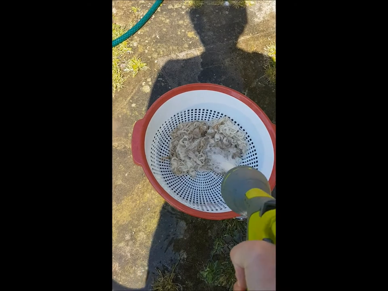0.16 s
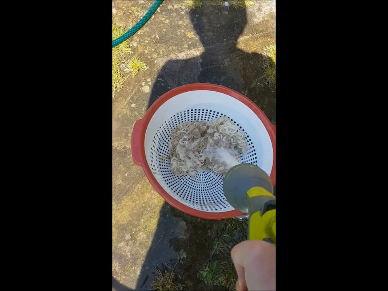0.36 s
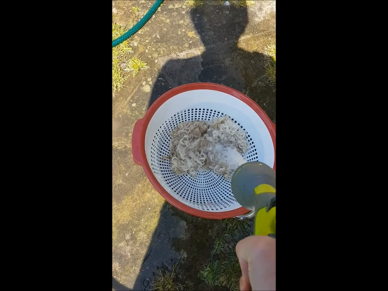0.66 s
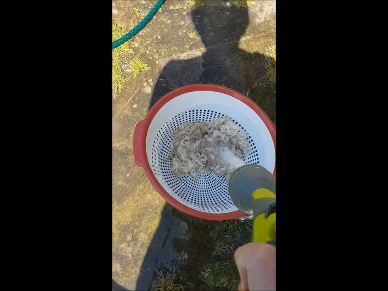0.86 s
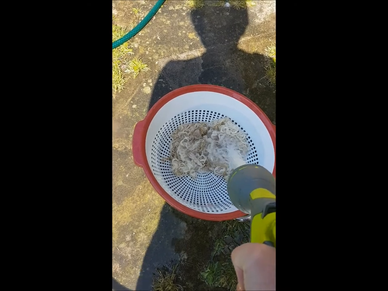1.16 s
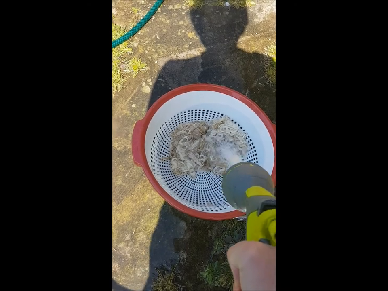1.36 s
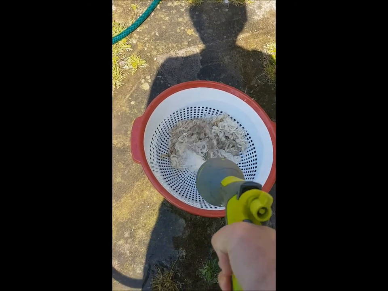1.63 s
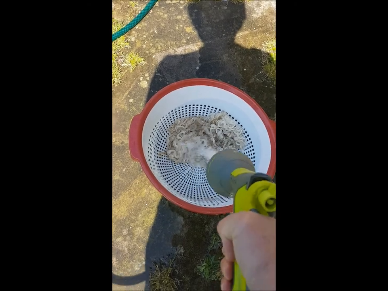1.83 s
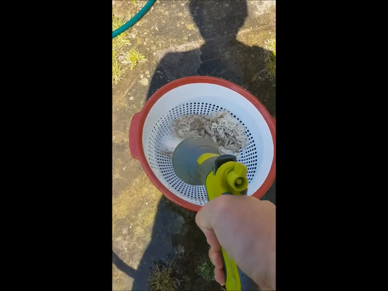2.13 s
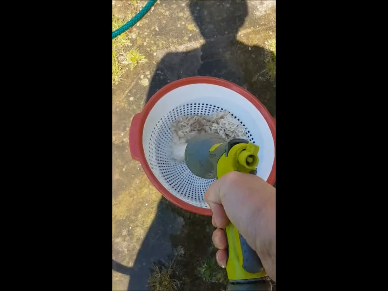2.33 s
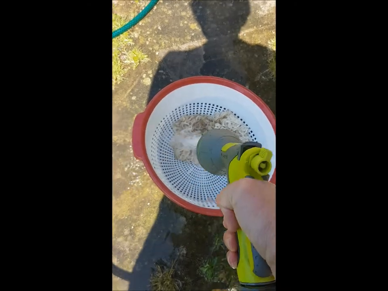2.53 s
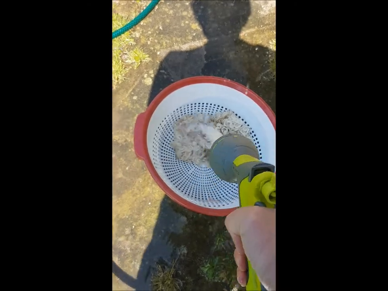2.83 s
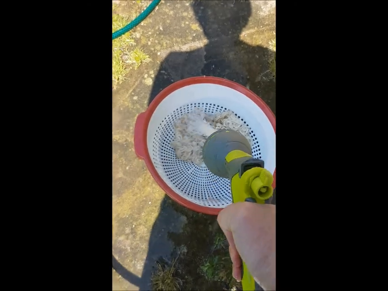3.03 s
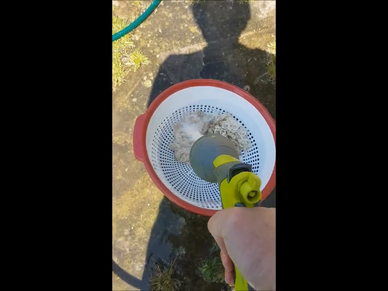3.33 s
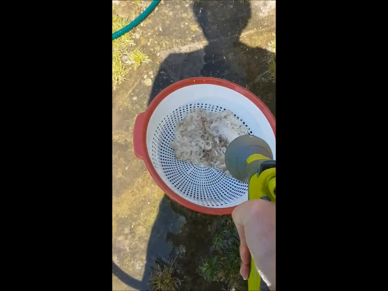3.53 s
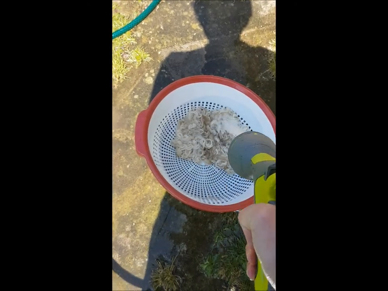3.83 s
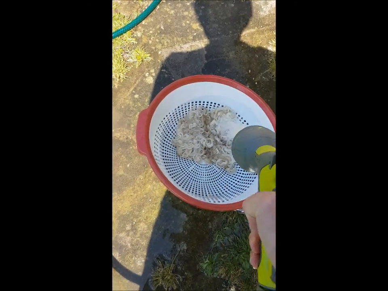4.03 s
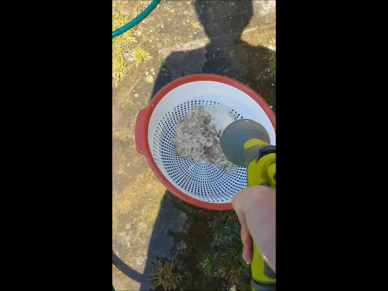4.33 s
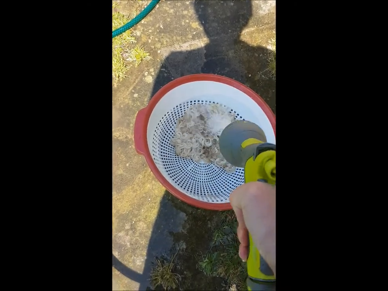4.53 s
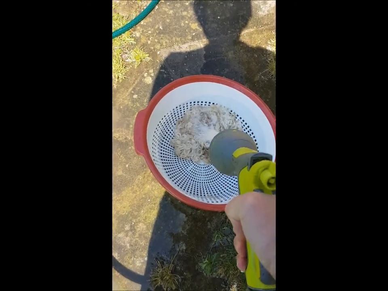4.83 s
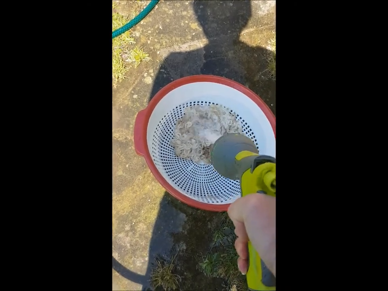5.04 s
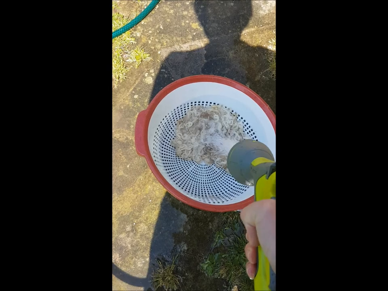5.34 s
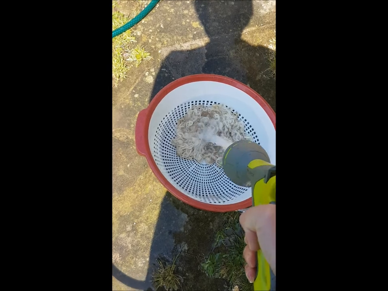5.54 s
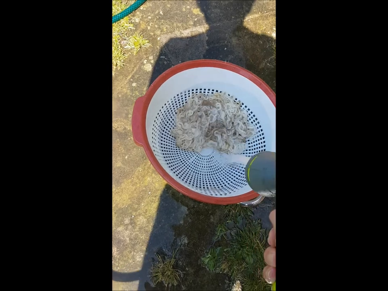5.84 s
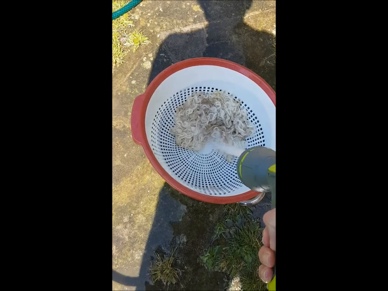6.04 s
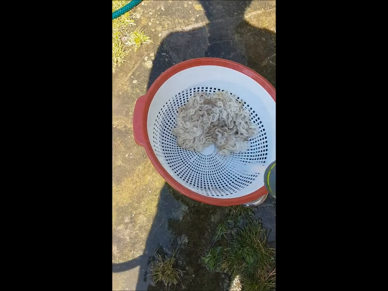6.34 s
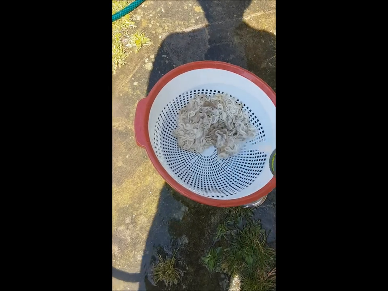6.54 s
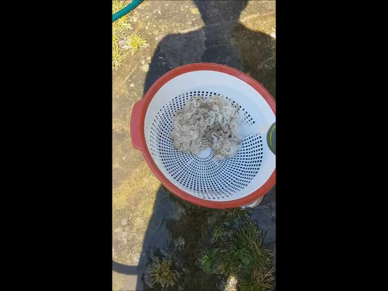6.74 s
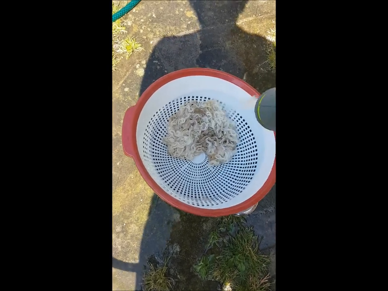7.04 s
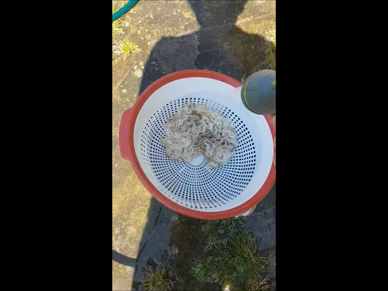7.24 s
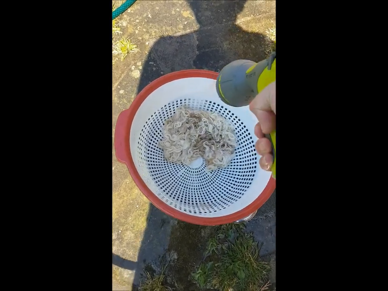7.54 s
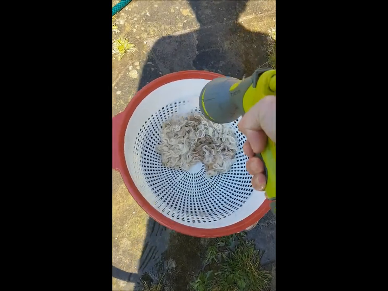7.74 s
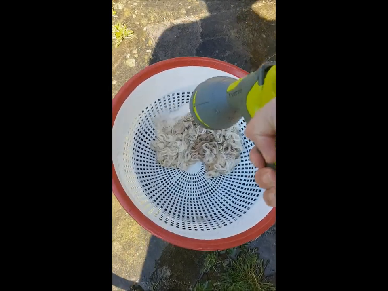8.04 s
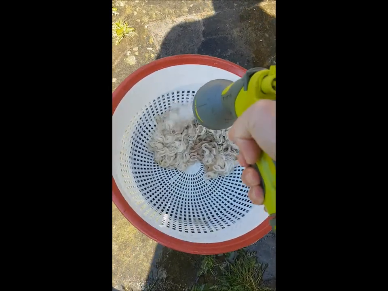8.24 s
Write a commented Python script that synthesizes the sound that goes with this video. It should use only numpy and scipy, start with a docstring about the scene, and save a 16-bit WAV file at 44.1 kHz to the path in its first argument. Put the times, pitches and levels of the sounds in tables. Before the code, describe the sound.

Outdoors, a hose nozzle sprays steadily into a plastic colander, a bright gritty hiss with hollow drumming as the jet sweeps bare wall and wet heap.

```python
"""Paved ground outdoors: a garden hose sprays into a plastic colander, heard from above at two microphone ports.
Dense drops, as noise with random jumps, ring the bowl's wall modes, splash on the food and hiss as mist.
Where the jet lands sets the mix, by level curves; narrow bands of the water swell and fade at random.
Light wind rumbles at each port on its own and thumps the right one; a faint low hum swells twice."""
import sys
import numpy as np
from scipy import signal
from scipy.fft import rfft, irfft, next_fast_len
from scipy.io import wavfile
from scipy.ndimage import uniform_filter1d

SR = 44100
rng = np.random.default_rng(int(sys.argv[2]) if len(sys.argv) > 2 else 0)


def waveform_to_disk(signal):
    """Save audio, clipped to [-1, 1], as 16-bit WAV at the path in sys.argv[1]."""
    frames = np.transpose(np.atleast_2d(signal))
    scaled = np.clip(frames, -1, 1) * 32767
    samples = np.round(scaled).astype(np.int16)
    wavfile.write(sys.argv[1], SR, samples)


N = 369999
TIME_S = np.arange(N) / SR
SIZE = next_fast_len(N, real=True)
BIN_HZ = np.fft.rfftfreq(SIZE, 1 / SR)


def undb(db):
    """Amplitude ratio of a level in dB."""
    return np.exp(np.asarray(db) * np.log(10) / 20)


def unit(x):
    """Scales x to an RMS of 1."""
    return x / np.sqrt(np.mean(x ** 2))


def swing(x):
    """Deviation of a curve from its mean."""
    return x - np.mean(x)


def curves(table):
    """Table columns joined by straight lines, one value a sample."""
    s, *columns = np.transpose(table)
    return [np.interp(TIME_S, s, column) for column in columns]


def walk(rate_hz):
    """Random levels held 1 / rate_hz and slewed twice; spread near 1."""
    hold = int(SR / rate_hz)
    steps = np.repeat(rng.standard_normal(N // hold + 1), hold)
    slewed = uniform_filter1d(uniform_filter1d(steps, hold), hold)
    return 1.3 * slewed[:N]


def band(spectrum, hz, width_hz):
    """Steep resonance without phase turn, so that neighbouring bands add up smoothly; RMS 1."""
    f = BIN_HZ + 1  # keeps clear of division by zero
    detuning = (f - hz ** 2 / f) / width_hz
    return unit(irfft(spectrum / (1 + detuning ** 2), SIZE)[..., :N])


def slide(x, shift_hz):
    """Moves every frequency of x by a changing amount."""
    turn = np.exp(2j * np.pi * np.cumsum(shift_hz) / SR)
    return np.real(signal.hilbert(x, SIZE)[:, :N] * turn)


def drops(big_db, big_share=.02, tail_s=0.00074, most_db=12):
    """Spectra of two streams of dense impacts: noise that jumps where a larger drop lands, in both alike."""
    landed = rng.random(N) < big_share
    hits = landed * undb(np.minimum(big_db * rng.exponential(size=N), most_db))
    keep = np.exp(-1 / (tail_s * SR))
    strength = 1 + 0.33 * signal.lfilter([1], [1, -keep], hits)
    return rfft(strength * rng.standard_normal((2, N)), SIZE)


def surges():
    """Brief lifts in dB, each a smooth bump, as the jet sweeps across bare wall."""
    # bumps: centre_s, length_s, lift_db
    bumps = [(2.02, 0.078, 5.5), (2.172, 0.059, 5.5), (2.51, 0.073, 6.5), (3.738, 0.06, 6), (4.19, .08, 4),
             (4.36, .1, 2), (5.285, .05, 4), (5.838, 0.086, 3), (6.47, 0.14, 3.5), (8.173, 0.083, 4.5)]
    return sum(db * np.exp(-(2 * (TIME_S - s) / length_s) ** 2) for s, length_s, db in bumps)


def bowl():
    """Drops ring each wall mode; a broad skirt stands for the weaker modes around it; the jet sputters."""
    # wall modes, low to high: pitch_hz, width_hz, skirt_width_hz, skirt_db, trim_db
    modes = [(383, 44, 272, 5, 0.7), (771, 218, 210, -11, -1.54), (1203, 430, 380, -9, -2.8),
             (1764, 310, 420, -8, -7), (2208, 420, 1000, 1.5, 2.57), (2827, 960, 890, 20, 7.5)]
    # pooled water's resonance: pitch_hz, width_hz, trim_db
    pool = (617, 165, -8)
    # lowest mode: time_s, level_db
    lowest = [(0.0, -52.5), (1.44, -54.5), (1.65, -57), (1.89, -55), (2.37, -59), (3.36, -50.5),
              (3.72, -55.5), (4.44, -50), (6.15, -55.5), (6.27, -62), (7.38, -55), (7.71, -65.5),
              (8.28, -64), (8.39, -70)]
    # main (second) mode, high on bare wall, low where the jet sinks into the heap: time_s, level_db
    main = [(0.0, -55.0), (0.28, -54), (1.94, -55), (1.98, -45.5), (2.18, -41.5), (2.24, -46.5),
            (2.5, -43.5), (2.66, -57.5), (3.26, -42.0), (3.56, -45.5), (3.6, -56), (3.7, -48), (4.1, -44.5),
            (4.14, -41), (4.4, -41.0), (4.5, -51), (4.54, -40), (4.6, -50.5), (4.82, -48.5), (4.88, -53.0),
            (4.96, -48.5), (5.12, -55), (6.22, -46.5), (6.26, -54.5), (6.5, -43), (6.84, -47.0),
            (6.94, -38.5), (7.28, -48), (8.08, -41), (8.18, -35), (8.32, -46.5), (8.39, -46)]
    # third mode: time_s, level_db
    third = [(0.0, -52), (1.04, -56.0), (1.58, -49), (1.72, -60.0), (2.18, -49), (2.26, -50.5),
             (3.8, -52.5), (4.3, -46.0), (4.56, -51.5), (6.36, -51.5), (6.46, -49.5), (6.84, -53.0),
             (6.96, -44), (7.6, -43.5), (7.68, -42.5), (8.39, -49.5)]
    # fifth mode, whose pitch wanders with the aim: time_s, level_db, pitch_hz
    wander = [(0.0, -50.5, 2110.0), (1.47, -48, 2230.0), (1.56, -51, 2220.0), (1.71, -55, 2210.0),
              (2.22, -47.5, 2160.0), (2.85, -54, 2150.0), (4.23, -48, 2100.0), (4.53, -51.5, 2030.0),
              (4.74, -49, 2030.0), (5.73, -51.5, 2120.0), (5.82, -50.0, 2130.0), (6.03, -53.5, 2130.0),
              (6.39, -49.5, 2120.0), (6.9, -50.5, 2090.0), (7.08, -43.5, 2270.0), (7.65, -46, 2210.0),
              (7.71, -49, 2210.0), (8.39, -52.0, 2070.0)]
    # highest mode: time_s, level_db
    highest = [(0.0, -49.5), (0.66, -53.5), (0.84, -50), (1.44, -53.0), (1.53, -59.5), (1.92, -50),
               (2.43, -55.5), (2.76, -53.5), (4.77, -57), (5.1, -59.5), (5.97, -54.5), (6.57, -56.5),
               (7.98, -54), (8.39, -59)]
    wander_row = 4
    opposed = 0.61  # share of the highest mode's drive that swings against its neighbour

    knock, sputter = drops(big_db=2.0, big_share=.004, tail_s=0.0018, most_db=11.5), walk(35)
    # other drops drive the wandering mode, so it does not beat against its fixed neighbours
    others = drops(big_db=-2.0, big_share=0.0043, tail_s=0.0024, most_db=13)

    (lowest_db,), (main_db,), (third_db,) = curves(lowest), curves(main), curves(third)
    (wander_db, wander_hz), (highest_db,) = curves(wander), curves(highest)
    fourth_db = -51.5 + 0.28 * swing(main_db) + 0.13 * swing(third_db)
    lift_db = surges()
    levels_db = [lowest_db, main_db, third_db + 0.97 * lift_db, fourth_db + lift_db,
                 wander_db + 0.6 * lift_db, highest_db]

    # water pools as the rinsing goes on
    pool_hz, pool_width_hz, pool_trim_db = pool
    pool_rise_db_per_s = 2
    pool_db = -56.5 + 0.61 * swing(main_db) + pool_rise_db_per_s * swing(TIME_S)
    out = band(knock, pool_hz, pool_width_hz) * undb(pool_db + pool_trim_db + 0.81 * walk(22))

    shared_surge = walk(14)
    for k, ((hz, width_hz, skirt_hz, skirt_db, trim_db), level_db) in enumerate(zip(modes, levels_db)):
        drive = knock
        if k > wander_row:  # leaves a dip between the two highest modes
            drive = np.sqrt(1 - opposed ** 2) * others - opposed * knock
        if k == wander_row:
            ring = slide(band(others, hz, width_hz), wander_hz - hz)
        else:
            ring = band(drive, hz, width_hz)
        ring = ring + undb(skirt_db) * band(drive, hz, skirt_hz)
        shared_db = 0.8 * sputter + 0.52 * shared_surge
        own_db = 0.56 * walk(40) + 0.83 * walk(16)
        out = out + unit(ring) * undb(level_db + trim_db + shared_db + own_db)
    return out


def hiss(bands, level_db, bright_db, grain, sputter_db, flicker_db):
    """Fine drops through broad bands that sputter together and flicker alone; brightness tips top against bottom."""
    out = 0
    for tip, (hz, width_hz, band_db) in zip(np.linspace(-.5, .5, len(bands)), bands):
        own_db = flicker_db * (walk(25) + 0.66 * walk(7))
        out = out + undb(band_db + tip * bright_db + own_db) * band(grain, hz, width_hz)
    return unit(out) * undb(level_db + sputter_db)


def spray():
    """Splash on the food and mist from the nozzle; each has its own drops, the jet's sputter moves both."""
    # splash: time_s, level_db
    splash_curve = [(0.0, -48), (0.33, -51.5), (0.42, -46.5), (0.78, -51), (1.47, -49), (1.62, -52.5),
                    (2.1, -51), (2.22, -55.5), (3.6, -47), (3.69, -50.5), (4.26, -51), (4.74, -46),
                    (5.67, -48.5), (5.73, -52.5), (6.09, -49.5), (6.27, -52), (7.53, -53.0), (8.07, -49.5),
                    (8.28, -42.5), (8.39, -49)]
    # lower mist bands: time_s, level_db
    mist_curve = [(0.0, -56.5), (0.22, -54.5), (1.42, -54), (2.3, -58), (2.4, -60), (2.52, -55),
                  (2.68, -53), (4.36, -55), (4.44, -49), (5.66, -52.5), (5.82, -55.5), (6.14, -51.5),
                  (6.36, -61), (6.64, -56.5), (7.54, -56.5), (8.16, -50.5), (8.28, -42), (8.39, -48)]
    # splash bands: pitch_hz, width_hz, level_db
    splash_bands = [(3670, 1940, 8), (4420, 940, -3.5), (5830, 1300, 3.5), (6760, 2400, -1.5)]
    # mist bands: pitch_hz, width_hz, level_db
    mist_bands = [(7970, 2550, 0.5), (10340, 2700, -5), (12700, 3800, 0), (14700, 4700, 1.5)]
    (splash_db,), (haze_db,) = curves(splash_curve), curves(mist_curve)
    surge, sputter = walk(14), walk(30) + 1.4 * walk(80)

    splash_swing = swing(splash_db)
    steadied = 1 - 0.36  # the lower splash bands swing less than the upper ones
    splash_bright_db = steadied * splash_swing + 0.6 * walk(6)
    splash_db = splash_db - steadied / 2 * splash_swing + 0.4 * surge + 0.55 * walk(9)
    splash = hiss(splash_bands, splash_db + 3.5, splash_bright_db, drops(big_db=3.0),
                  0.39 * sputter, flicker_db=1.37)

    mist_swing = swing(haze_db) + 0.91 * surge + 1.45 * walk(16)
    # the topmost hiss comes from the nozzle itself: it swells less than the rest and grows slowly
    bright_rise_db_per_s = 0.7
    mist_bright_db = bright_rise_db_per_s * swing(TIME_S) - 0.84 * mist_swing
    mist_db = np.mean(haze_db) + 5.5 + 0.46 * mist_swing
    fine_drops = drops(big_db=7.0, big_share=.008, tail_s=0.00039, most_db=18)
    mist = hiss(mist_bands, mist_db, mist_bright_db, fine_drops, 0.36 * sputter, flicker_db=0.8)
    return splash + mist


def small_modes(pair, depth_db=2.0, wide_bins=2, long_frames=7):
    """Many small modes ring and fade as the jet moves: narrow bands swell at random for hundredths of a second."""
    z = signal.stft(pair, nperseg=1024, noverlap=768)[2]
    field = rng.standard_normal(z.shape[1:])
    for _ in range(2):
        field = uniform_filter1d(field, wide_bins, axis=0)
        field = uniform_filter1d(field, long_frames, axis=1)
    gain = unit(undb(depth_db * unit(field)))
    return signal.istft(z * gain, nperseg=1024, noverlap=768)[1][:, :N]


def ports(pair):
    """The left port hears the first stream; the right hears it turned in phase, mixed with the second."""
    # balance of the ports: pitch_hz, left_minus_right_db, likeness (0-1)
    balance = [(250, -2.5, 1), (400, -7.5, 0.88), (470, 3.5, 0.2), (652, 7, 1), (960, -6, 0.56),
               (1200, 0, 0.93), (1800, -2.5, 0.53), (2100, -4.5, 0.65), (3120, -4.5, 0.36),
               (4000, -2.5, 0.4), (5250, -4.5, 0.85), (5640, -2, 0), (6800, -6, 0.99), (8060, 9.5, 0.12),
               (8800, 12.5, 0.26), (10000, 10, 0), (11600, 14, .17), (13000, 2, .38), (14600, 4, 0.9),
               (15600, -3, 1)]
    # phase lead of the right port: pitch_hz, lead_rad
    lead = [(300, .2), (500, -.7), (850, .6), (1050, -.7), (1700, .3), (2100, -.7), (3200, -1.9),
            (3900, -1.2), (4250, -2.3), (4600, 0)]
    hz, *columns = np.transpose(balance)
    pan_db, alike = (np.interp(BIN_HZ, hz, column) for column in columns)
    alike = np.clip(alike, 0, 1)
    turn = np.exp(1j * np.interp(BIN_HZ, *np.transpose(lead)))
    first, second = rfft(pair, SIZE)
    right = alike * turn * first + np.sqrt(1 - alike ** 2) * second
    left_share = 1 / (1 + undb(-pan_db))  # the louder port keeps most of the level
    return irfft(2 * np.array([left_share * first, (1 - left_share) * right]), SIZE)[:, :N]


def wind():
    """Low turbulence, unrelated and gusty at each port, with single thumps on the right."""
    # rumble at the left port, before the gain below: time_s, level_db
    left = [(0.0, -72.5), (0.24, -73), (0.9, -84), (1.56, -75.5), (3.0, -83.5), (3.33, -78), (4.23, -82.0),
            (4.62, -73), (5.01, -88), (6.72, -82.5), (6.84, -79), (8.39, -81)]
    # rumble at the right port, before the gain below: time_s, level_db
    right = [(0.0, -69), (0.69, -71), (0.84, -87), (2.22, -70), (2.34, -82.5), (3.33, -78.5), (3.42, -68),
             (4.17, -68), (4.35, -80), (5.13, -95), (5.31, -68), (5.61, -82), (5.85, -68), (6.15, -79),
             (6.24, -66.5), (7.14, -68.5), (7.32, -56), (7.59, -75), (7.77, -60.5), (8.39, -80)]
    # gust thumps on the right port, before the gain below: time_s, level_db
    thumps = [(2.911, -55), (3.545, -48), (3.83, -46), (3.989, -50), (4.139, -55), (5.847, -53),
              (6.275, -47), (6.388, -52), (6.711, -46), (7.219, -49), (7.278, -56), (7.324, -48),
              (7.359, -44), (7.388, -36), (7.429, -50), (7.766, -38), (7.786, -46), (8.004, -41.5)]
    out = np.empty((2, N))
    for k, table in enumerate((left, right)):
        noise = rfft(rng.standard_normal(N), SIZE)
        rumble = band(noise, 76.0, 84.0) + 0.17 * band(noise, 100.0, 200.0)
        gusty = unit(rumble * undb(2.7 * walk(30) + 0.82 * walk(8.3)))
        out[k] = 2 * gusty * undb(curves(table)[0] + 2.5)

    thump_hz, delay_s, half = 133, 0.0063, 800  # half: samples either side of the centre
    t = np.arange(-half, half) / SR
    thump = np.exp(-(t * thump_hz / .6) ** 2) * np.sin(2 * np.pi * thump_hz * t)
    for s, level_db in thumps:
        i = int((s + delay_s) * SR)
        out[1, i - half:i + half] += 2 * undb(level_db) * thump
    return out


def hums():
    """Low sine tones under short half-sine swells, alike at both ports."""
    # swells: start_s, length_s, pitch_hz, peak_db
    swells = [(0.127, 0.2, 93.3, -59), (1.116, .22, 95, -66)]
    out = 0
    for s, length_s, hz, peak_db in swells:
        swell = np.sin(np.pi * np.clip((TIME_S - s) / length_s, 0, 1))
        out = out + undb(peak_db) * swell * np.sin(2 * np.pi * hz * TIME_S)
    return out


def scene():
    """Water through the ports, panned as the nozzle moves sideways, plus wind and hum."""
    # sideways drift, its mean removed below: time_s, left_minus_right_db
    drift = [(0.0, 0), (3.04, -0.5), (3.29, 0), (3.48, -1.5), (5.91, -1.0), (8.39, -2)]
    pan_db = swing(curves(drift)[0])
    water = ports(small_modes(bowl() + spray())) * undb(np.array([pan_db, -pan_db]) / 2)
    return water + wind() + hums()


def record(dry):
    """A steep elliptic low-pass cuts the top."""
    top_hz, ripple_db, stop_db = 15780, .2, 85
    return signal.sosfilt(signal.ellip(14, ripple_db, stop_db, top_hz, fs=SR, output="sos"), dry)


dry = scene()
out = record(dry)
waveform_to_disk(out)
```